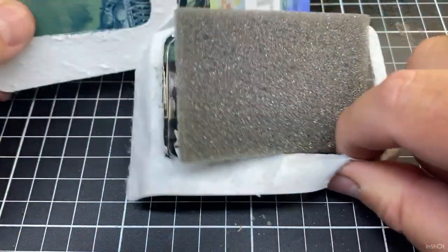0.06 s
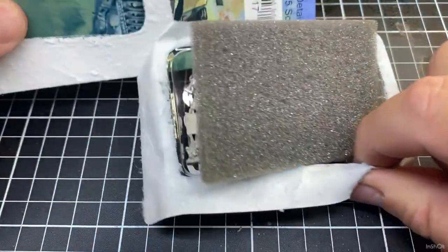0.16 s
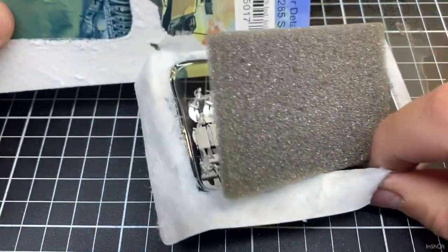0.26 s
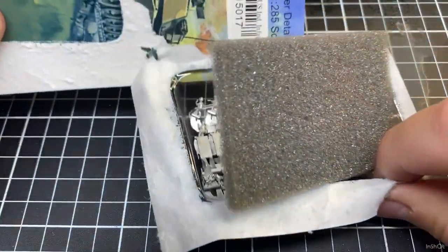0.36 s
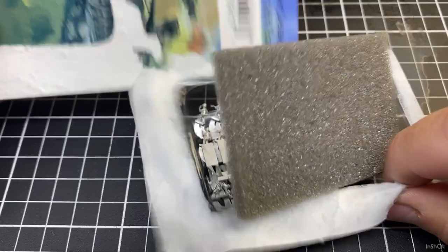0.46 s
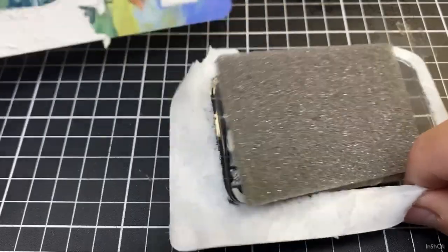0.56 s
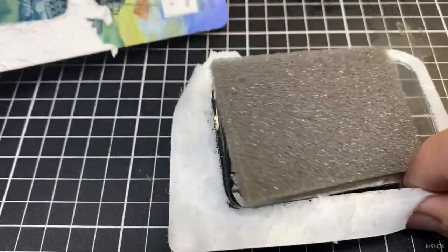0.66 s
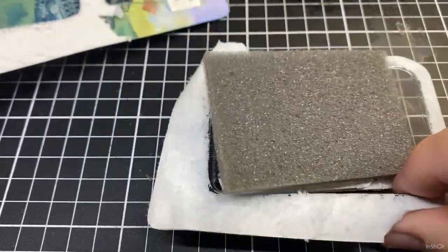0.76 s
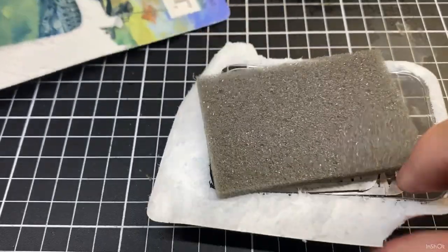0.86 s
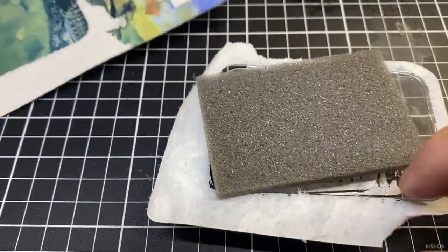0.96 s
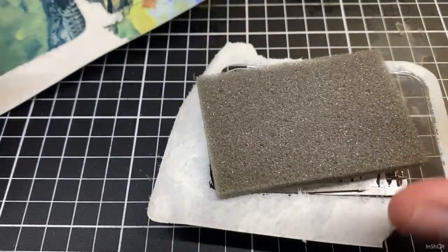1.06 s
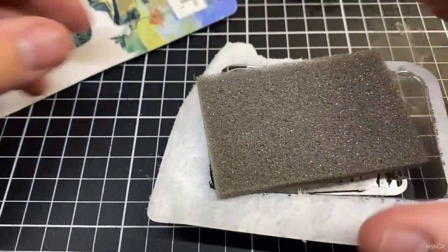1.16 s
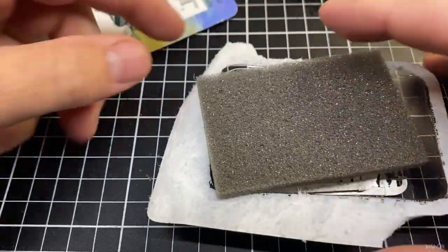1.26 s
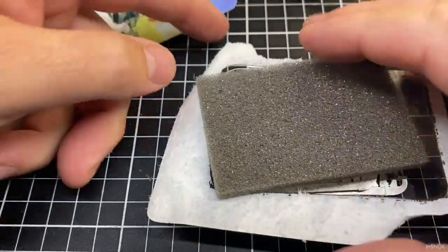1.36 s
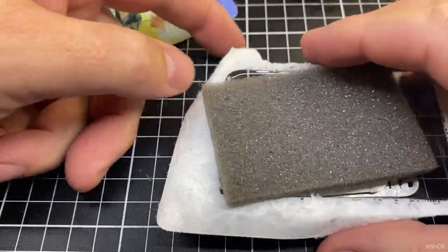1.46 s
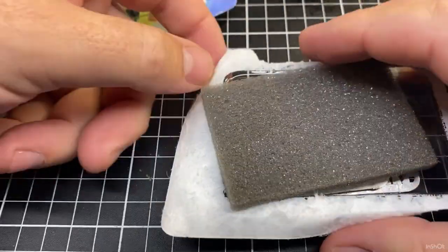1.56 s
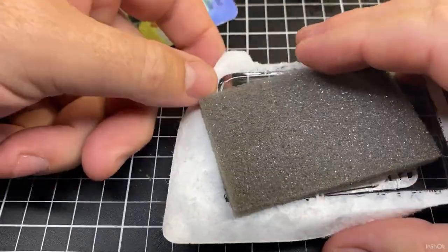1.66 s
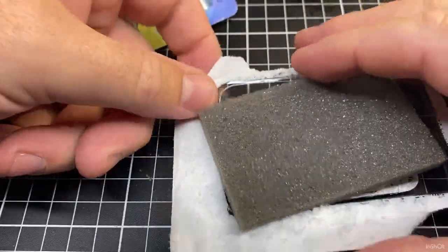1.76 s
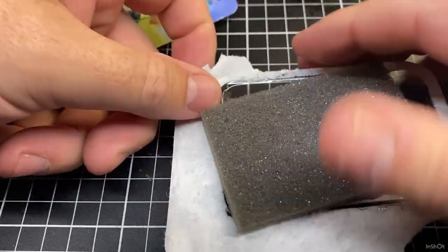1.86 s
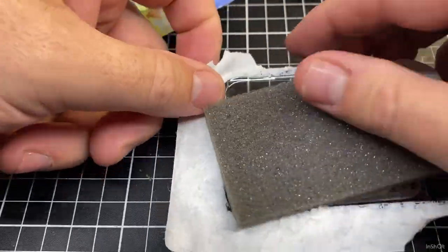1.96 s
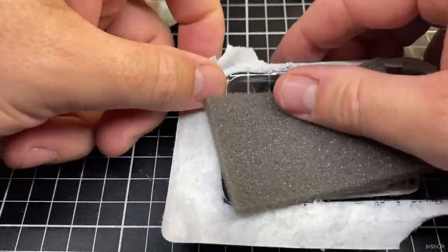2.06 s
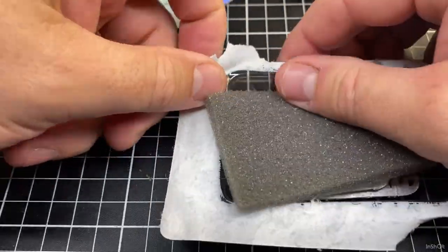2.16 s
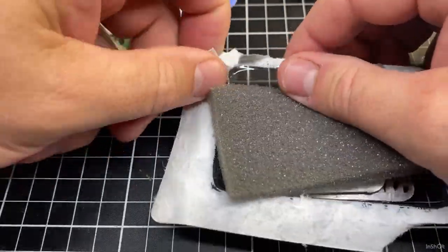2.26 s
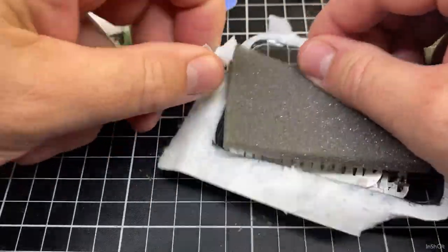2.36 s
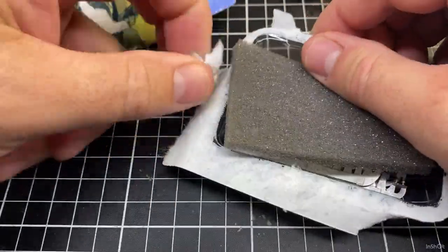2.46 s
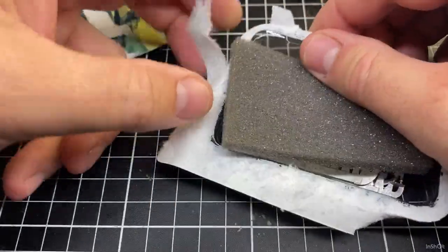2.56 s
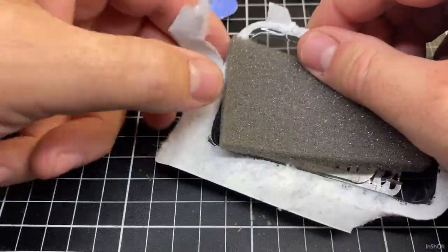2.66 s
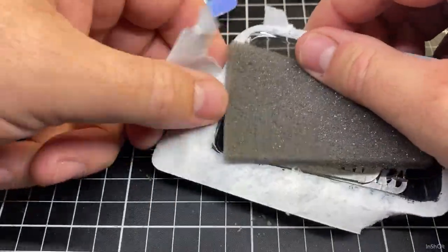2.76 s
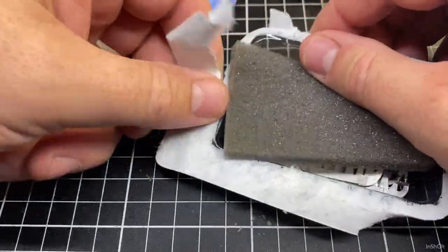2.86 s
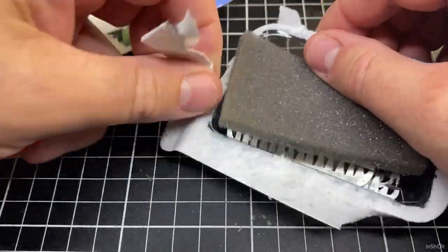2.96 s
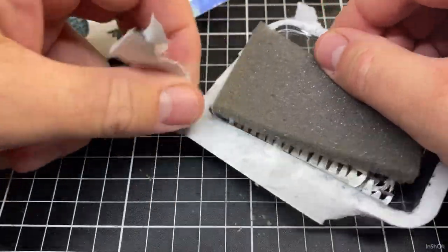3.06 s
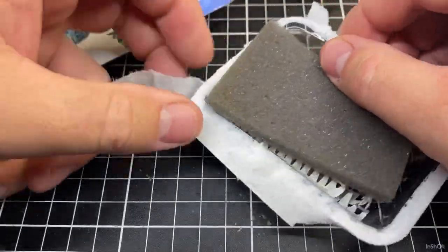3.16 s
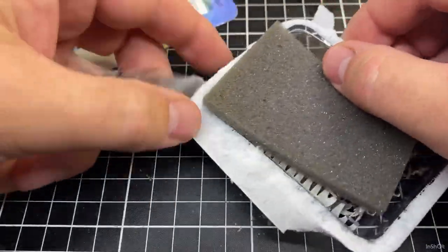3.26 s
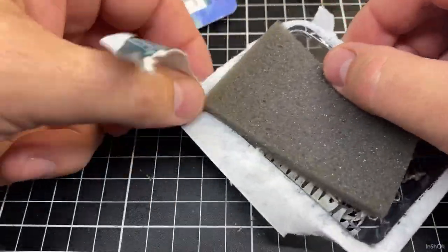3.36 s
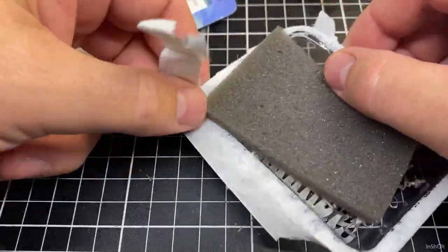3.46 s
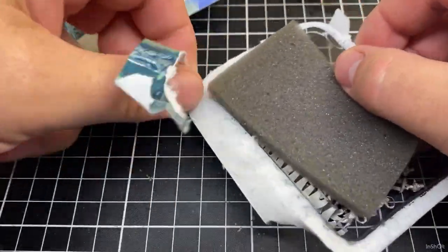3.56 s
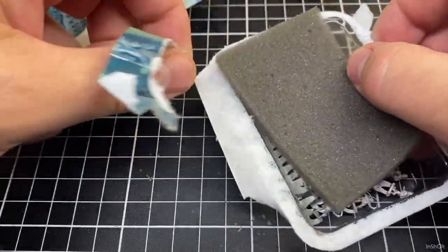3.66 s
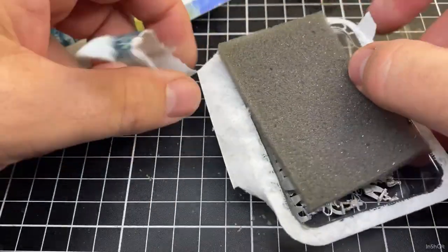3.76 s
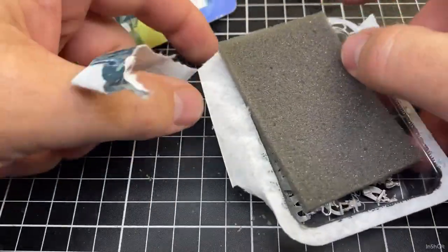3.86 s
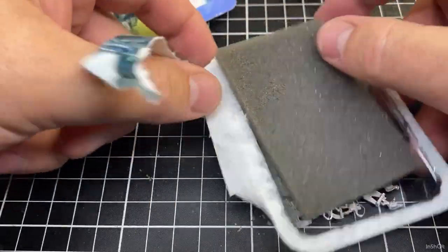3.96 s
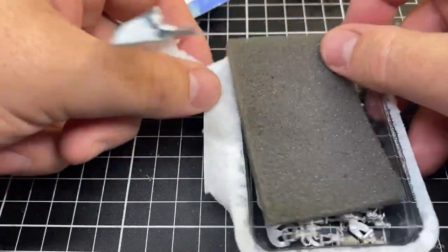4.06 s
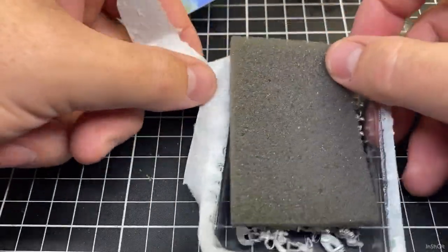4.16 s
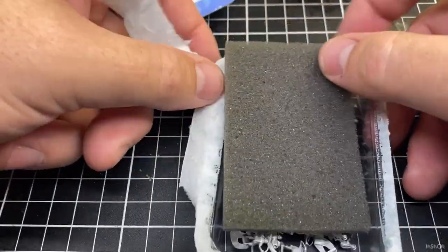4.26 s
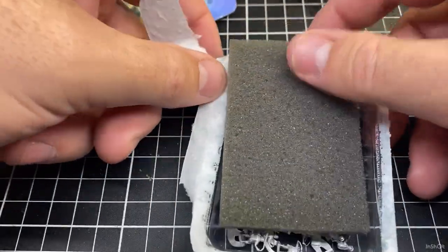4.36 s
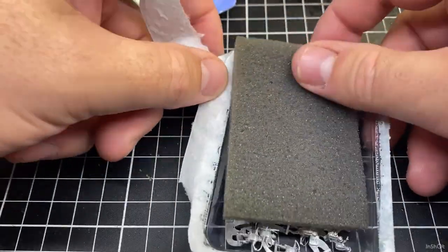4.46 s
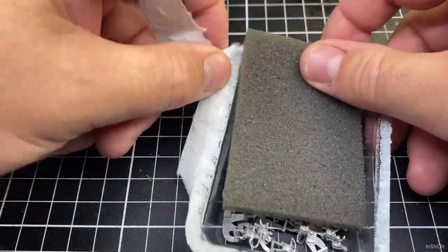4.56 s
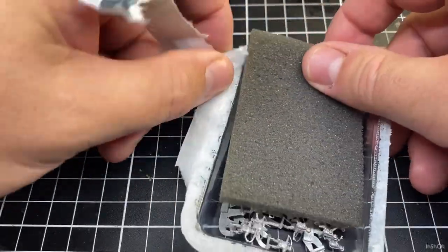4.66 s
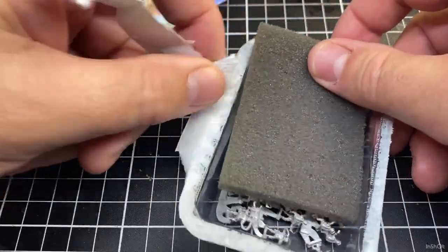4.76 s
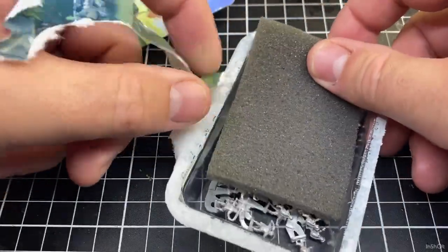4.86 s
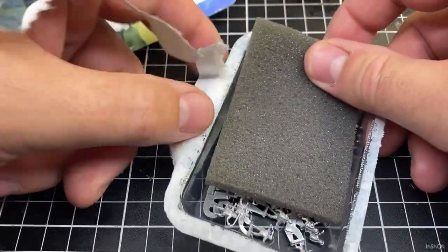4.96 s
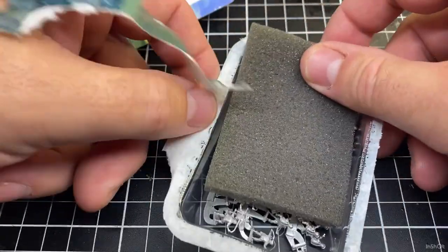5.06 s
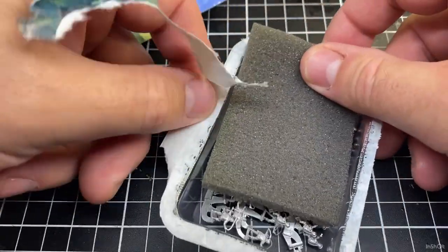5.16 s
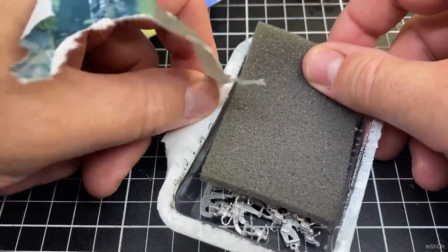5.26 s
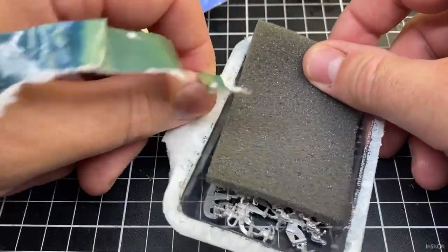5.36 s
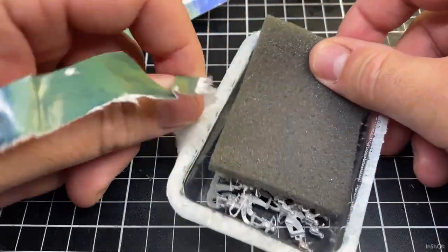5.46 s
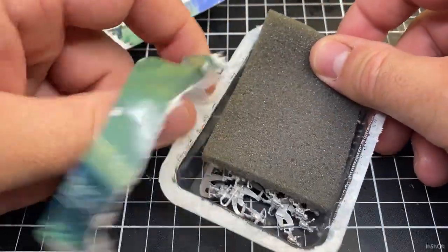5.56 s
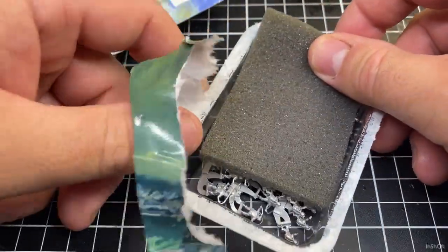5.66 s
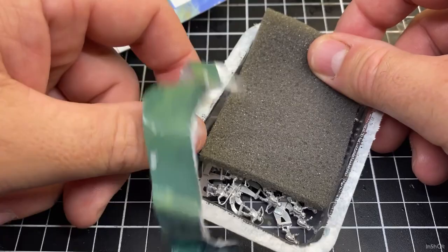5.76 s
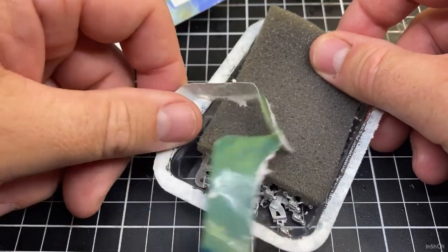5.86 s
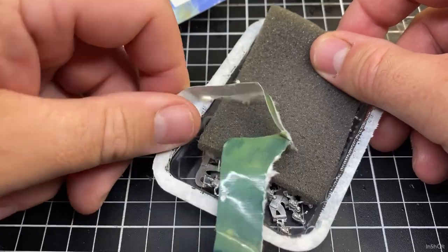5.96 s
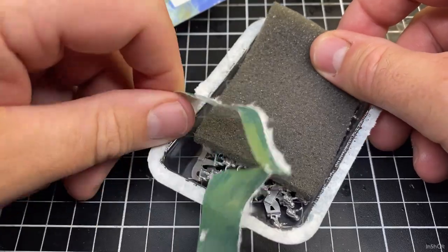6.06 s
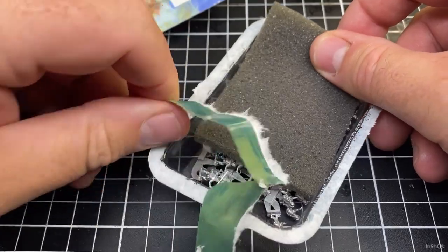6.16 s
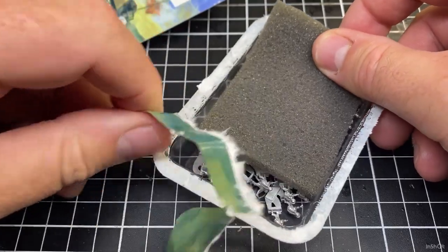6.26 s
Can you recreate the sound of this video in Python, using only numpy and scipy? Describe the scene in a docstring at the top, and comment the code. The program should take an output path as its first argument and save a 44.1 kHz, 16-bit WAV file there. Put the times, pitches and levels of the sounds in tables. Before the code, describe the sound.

Hands peel paper from a thin plastic blister tray. A dense clatter of rips, plastic flexing and table knocks opens, then a quiet lull with small ticks. Crisp fibrous tears and single snaps follow in uneven groups, separated by soft rustling. Close and dry, with a short room tail and barely audible hum beneath.

```python
"""Sharp paper snaps and dense bright crackles, with knocks of hollow plastic, burst out at once and return in spells.
Hands peel the paper backing off a plastic blister tray on a table: noise under crackling envelopes is the fibres,
and the same ruptures shake resonant modes that make the tray flex, pop and ring briefly.
Decaying low cosines bump the table top; a small quiet room answers with a short tail of shaped noise.
Low rumble, wavering hum and a faint tone lie underneath."""
import sys
import numpy as np
from scipy import signal
from scipy.fft import rfft, irfft, next_fast_len
from scipy.io import wavfile
from scipy.ndimage import uniform_filter1d, map_coordinates

SR = 44100
rng = np.random.default_rng(int(sys.argv[2]) if len(sys.argv) > 2 else 0)


def undo_db(level):
    """Turn decibels back into plain size, where 20 dB means ten times bigger."""
    steps = np.asarray(level, float) / 20
    return 10 ** steps


def unload_audio(sound):
    """Save the sound as a 16-bit wav file, at the path given as the first command line argument."""
    columns = np.transpose(np.atleast_2d(sound))
    # keep every value between -1 and 1, then stretch to whole-number steps
    steps = np.round(np.clip(columns, -1, 1) * 32767)
    wavfile.write(sys.argv[1], SR, steps.astype(np.int16))


N = 277830  # samples

# Levels in the tables are relative, ahead of the mix gains.
# Low rumble level over time: t/s, level/dB
RUMBLE = [(0.0, -50), (0.44, -48.5), (1.07, -63), (1.93, -59), (2.26, -56), (2.53, -60), (3.8, -53),
          (4.02, -56.5), (4.4, -59.5), (4.74, -63), (5.07, -70), (5.47, -60), (5.88, -66), (6.3, -63.5)]
# Colour of the rumble: f/Hz, density level/dB
AIR = [(15, -45), (25, -5.5), (53, -5.5), (80, -5), (160, -10), (300, -11.5), (450, -20), (1200, -33),
       (5000, -44), (16000, -49)]
# Mains hum: f/Hz, level/dB
HUM = [(50, -63.5), (100, -65)]
# Faint tone that drops out late on and creeps partly back: t/s, level/dB
DRONE = [(0, -67), (4.5, -71), (4.7, -101), (6.3, -83.5)]
DRONE_HZ = 295.4
# Decay of the room's answer: f/Hz, t60/s
WALLS = [(200, 0.313), (2000, 0.314), (10000, 0.1346)]
# Tray against table: t/s, level/dB, pitch f/Hz, t60/s
BUMPS = [(0.004, -31.5, 72.6, 0.128), (0.078, -22, 219, 0.0274), (0.278, -34.5, 150.5, 0.14),
         (0.369, -15, 81.8, 0.0234), (0.473, -21, 159.4, 0.0886), (.478, -22.5, 85.6, 0.116),
         (0.489, -20.5, 329.7, 0.069), (0.508, -18, 53.8, 0.135), (0.708, -33, 66.6, 0.172),
         (0.822, -37, 55.6, 0.083), (.842, -35, 69, .06), (0.852, -32.5, 290, 0.0634),
         (0.893, -36, 74.8, .08), (0.925, -29, 58.6, 0.071), (0.942, -26, 112.6, 0.038),
         (1.576, -34.5, 281, 0.0246), (2.841, -44.5, 179.2, 0.17), (3.136, -47.5, 77.5, 0.19),
         (3.743, -40, 203.7, 0.089), (4.0, -36, 298.4, 0.052), (4.102, -44, 151, 0.066),
         (4.574, -34.5, 344.2, 0.08), (5.419, -33.5, 250.3, 0.076)]
# Modes of the plastic shell: f/Hz, width/Hz, level/dB
TRAY = [(373, 352, -3.5), (544.4, 239, -2.5), (830.6, 217.3, 1), (1040, 187.4, 0.5), (1454.7, 539, -3),
        (1750, 499.6, -1.5), (2156.4, 559, -2.5), (2681, 625, -2.5), (3229, 603, -0.5), (4000, 1060, -6.5),
        (5486, 950, -8)]
# Colour of the tearing paper: f/Hz, density level/dB
PAPER = [(1200, -24), (3000, -27), (4500, -8), (5900, -5), (6900, -2.5), (7700, -1), (8600, 5.5),
         (9800, -1), (11200, -3.5), (12700, -5), (14500, -4), (16000, -15)]
# Balance of the paper's treble: t/s, top treble up and the rest down level/dB
TAUT = [(0, 0.5), (.5, -1), (1.5, -1.5), (2.2, 2), (2.37, -3), (2.9, 1), (3.55, -0.5), (4.6, 0.5),
        (5.25, 2.5), (5.45, -1), (6.1, 0.5), (6.3, 0.5)]
# Fingers handling the pack between rips: t/s, paper rustle level/dB, tray rustle level/dB
PULL = [(0, -51, -38.5), (0.65, -63, -55.5), (0.9, -62.5, -61.5), (1.2, -105, -89), (1.29, -89.5, -84.5),
        (1.31, -64.5, -71), (1.45, -67, -60), (1.54, -74.5, -66.5), (1.62, -62, -58), (1.95, -66.5, -57.5),
        (2.09, -55.5, -57), (2.53, -63, -58), (3.16, -56.5, -52.5), (3.71, -50.5, -53.5), (3.9, -70.5, -65),
        (4.04, -62, -52.5), (4.4, -63.5, -65.5), (4.82, -53.5, -50.5), (4.885, -60, -49),
        (4.895, -67.5, -63), (4.94, -79, -78.5), (5.0, -68, -66), (5.02, -51, -55), (5.06, -53, -52),
        (5.16, -56, -59), (5.56, -59, -55.5), (5.75, -62, -61.5), (5.93, -69.5, -72), (6.0, -67, -59),
        (6.3, -54.5, -48)]
# Long tears, one curve of effort each: t/s, paper level/dB, tray level/dB
TEARS = [
    [(0, -39, -31.5), (0.035, -43, -52.5), (0.1, -38.5, -39.5), (0.155, -43, -49), (0.175, -36.5, -35),
     (0.22, -41, -36), (0.252, -42.5, -46.5), (0.262, -37, -31), (0.297, -35, -30.5), (0.305, -47, -46.5),
     (0.345, -41.5, -46.5), (0.36, -42.5, -31.5), (0.38, -39, -32), (0.395, -50, -61.5),
     (0.415, -43.5, -40.5), (0.44, -39, -43), (0.45, -52, -56.5)],
    [(0.455, -38.5, -41.5), (0.466, -41.5, -41), (0.47, -24.5, -22), (0.51, -22, -17.5),
     (0.526, -21.5, -25), (0.535, -45, -43), (0.57, -45, -43), (0.63, -61, -47.5)],
    [(2.11, -68, -59), (2.122, -50.5, -62), (2.19, -43.5, -55), (2.2, -33, -30.5), (2.228, -37, -38),
     (2.25, -44.5, -46), (2.262, -31, -39), (2.28, -41, -44.5)],
    [(2.285, -34, -47.5), (2.303, -33.5, -31.5), (2.315, -23.5, -27.5), (2.338, -24, -31),
     (2.355, -22, -35), (2.389, -26, -39), (2.409, -30.5, -42.5), (2.419, -56.5, -63.5), (2.44, -57.5, -64)],
    [(2.77, -52.5, -47), (2.81, -38.5, -44), (2.845, -41, -45), (2.88, -47, -40.5), (2.9, -58.5, -45),
     (2.94, -40, -48.5), (2.985, -33.5, -32), (3.038, -37.5, -38.5), (3.048, -54, -49.5), (3.1, -45, -48)],
    [(3.43, -45.5, -65), (3.462, -47, -70), (3.48, -42, -38), (3.5, -41.5, -41.5), (3.532, -33.5, -33),
     (3.56, -41.5, -37), (3.585, -46, -45.5), (3.62, -37, -38), (3.674, -44, -46), (3.7, -70, -61.5)],
    [(4.66, -54, -70.5), (4.68, -45, -48), (4.704, -37, -37), (4.76, -33.5, -34), (4.782, -42, -37),
     (4.8, -68.5, -69.5)],
    [(5.165, -54, -62.5), (5.175, -44.5, -66), (5.21, -42, -51.5), (5.24, -42, -55), (5.28, -41, -52),
     (5.36, -37, -44.5), (5.385, -31.5, -39.5), (5.42, -32, -37.5), (5.435, -28.5, -29.5),
     (5.468, -29.5, -30.5), (5.485, -43.5, -36.5), (5.51, -57, -55)],
    [(5.97, -62, -67), (6.0, -42.5, -49), (6.065, -40, -43), (6.09, -57.5, -77), (6.105, -48, -63),
     (6.15, -36.5, -44.5), (6.17, -41.5, -57.5), (6.19, -34.5, -37), (6.268, -46, -51), (6.276, -32.5, -32),
     (6.3, -36.5, -38)],
]
# Where each long tear shakes the tray most: f/Hz
TEAR_GRIP = [2000, 2110, 2680, 1750, 2910, 4000, 2230, 2920, 3200]
# How narrowly each long tear picks its modes: fall/dB per octave
TEAR_FOCUS = [0.96, 3.6, 4.2, 8.2, 3.2, 4, 4.24, 3.4, 2.78]
# Short rips: start t/s, length/s, paper level/dB, tray level/dB, most shaken f/Hz
RIPS = [(0.776, 0.074, -63, -52.5, 1620), (0.705, 0.029, -53, -55, 2000), (0.859, 0.018, -49, -43, 2400),
        (0.888, 0.014, -57, -40, 1560), (1.301, 0.0886, -106, -58.5, 1790),
        (1.392, 0.042, -61.5, -60.5, 850), (1.564, 0.053, -55, -44, 814), (1.674, 0.045, -55.5, -81, 2000),
        (1.73, 0.044, -45.5, -44.5, 1540), (1.779, 0.067, -54, -52, 2320),
        (2.473, 0.02666, -45.5, -49.5, 2120), (2.613, 0.02277, -44, -41, 1760),
        (2.636, 0.04, -52, -51.5, 2460), (2.849, 0.0096, -23, -39.5, 2490),
        (3.267, 0.027, -40.5, -43.5, 1930), (3.372, 0.052, -50, -46, 2540),
        (3.479, 0.0048, -34.5, -52.5, 3200), (3.538, 0.014, -28.5, -28.5, 2600),
        (3.75, .02, -43, -43, 1970), (3.768, 0.046, -59.5, -52, 1500), (3.968, .018, -51.5, -54.5, 2070),
        (3.989, 0.024, -41, -37.5, 2500), (4.049, 0.096, -48, -46.5, 970),
        (4.206, 0.034, -44.5, -45.5, 2530), (4.246, 0.075, -51, -53, 2000),
        (4.547, 0.023, -49, -56.5, 2530), (4.564, 0.0046, -37, -39, 2670), (4.568, 0.022, -27.5, -27, 1990),
        (4.595, .04, -44, -68, 1900), (5.093, 0.039, -48, -50.5, 1990), (5.587, 0.042, -49.5, -43.5, 1500),
        (5.627, .02, -50.5, -47.5, 3000), (5.628, 0.021, -41, -39, 2480), (5.669, 0.0062, -57.5, -59, 2800),
        (5.8, 0.0502, -46, -48, 2520)]
# Single ruptures of the paper: t/s, paper level/dB, tray level/dB, tail t60/s, most shaken f/Hz
SNAPS = [(0.006, -24, -22.5, 0.0153, 2130), (0.052, -25.5, -37, .015, 2500), (0.068, -31, -33, 0.024, 2000),
         (0.075, -22.5, -26.5, 0.019, 2280), (.088, -29.5, -37.5, .015, 2500),
         (0.1718, -36, -30, 0.013, 2500), (0.182, -35.5, -32.5, 0.018, 2000),
         (.268, -29.5, -44, 0.017, 2500), (0.289, -34, -39, .025, 3020), (0.036, -37, -39.5, 0.013, 2490),
         (0.046, -30.5, -44.5, 0.017, 2490), (0.2562, -32.5, -36.5, 0.012, 3000),
         (0.358, -36, -40.5, .02, 2000), (0.363, -28, -26.5, 0.042, 1330),
         (0.411, -26.5, -35, 0.0099, 1637), (0.427, -31.5, -31.5, 0.026, 2000),
         (0.466, -23.5, -16, 0.035, 1420), (0.4747, -16, -24, 0.024, 1860), (.489, -29.5, -19, .015, 2590),
         (0.495, -25, -19, 0.023, 2446), (0.549, -38, -22.5, 0.013, 3027),
         (0.838, -41, -42.5, 0.0294, 2000), (0.8421, -35, -31.5, 0.044, 2780),
         (1.817, -27, -22.5, 0.01767, 2130), (2.204, -29, -20, 0.02, 3200),
         (2.209, -21, -21.5, 0.016, 2620), (2.219, -30.5, -25, 0.017, 2770),
         (2.244, -24.5, -28, 0.011, 2610), (2.279, -29, -35.5, .008, 3000),
         (2.292, -24, -27.5, 0.009, 1720), (2.809, -26.5, -30.5, 0.012, 2800),
         (2.818, -28, -39, 0.011, 2870), (2.853, -25, -26, 0.013, 2500), (2.8939, -37, -34.5, 0.013, 3000),
         (2.918, -22, -19.5, 0.0168, 1790), (2.941, -34, -46.5, .015, 3000),
         (2.976, -30, -34.5, 0.022, 2500), (3.008, -41.5, -37.5, .02, 2500),
         (3.426, -28, -52, 0.0091, 3530), (3.484, -21.5, -33, 0.02, 3100), (3.54, -23.5, -34, 0.012, 4000),
         (3.548, -27.5, -30.5, 0.02, 3800), (3.56, -26.5, -36.5, .015, 3200),
         (3.593, -25, -32.5, 0.021, 3200), (3.611, -27.5, -27, 0.017, 2110),
         (3.637, -29, -39.5, 0.011, 1780), (3.655, -29, -42, 0.023, 2740), (3.677, -25, -33.5, 0.01, 2310),
         (3.74, -31, -30, 0.0443, 2000), (3.986, -31, -32, 0.01, 2500), (4.003, -41.5, -28.5, 0.0062, 3060),
         (4.005, -43.5, -44, 0.013, 3000), (4.489, -50, -48, 0.024, 3020),
         (4.569, -32.5, -28, 0.0136, 2380), (4.571, -20.5, -32, 0.027, 1910),
         (4.615, -33.5, -42.5, 0.027, 1520), (4.668, -33.5, -39.5, 0.011, 1610),
         (5.171, -38.5, -45.5, 0.012, 2540), (5.119, -41, -45, 0.012, 3000),
         (5.193, -23.5, -31.5, 0.013, 3000), (5.247, -21, -34.5, 0.0107, 3000),
         (5.2222, -35, -44.5, .012, 3000), (5.301, -31.5, -37, 0.028, 3220),
         (5.338, -34.5, -46, 0.018, 3000), (5.3728, -30.5, -36.5, 0.0091, 3000),
         (5.41, -24, -33.5, 0.013, 3200), (5.395, -30, -50.5, 0.014, 1450),
         (5.423, -25.5, -22.5, 0.047, 1740), (5.472, -20.5, -24, 0.01, 1360),
         (5.647, -24.5, -26, 0.019, 5400), (5.957, -23, -23.5, 0.0065, 1750),
         (5.976, -32.5, -30.5, 0.027, 2080), (5.989, -28, -31, .035, 1770), (6.102, -38.5, -49, .02, 3200),
         (6.176, -25.5, -28.5, 0.014, 1330)]
# Dull knocks and pops of the tray: t/s, level/dB, tail t60/s, most shaken f/Hz, fall/dB per octave
KNOCKS = [(0.71, -34, 0.032, 1223, 10.5), (.795, -45.5, 0.058, 1600, 14.5),
          (0.805, -36.5, 0.025, 1690, 13.5), (0.881, -35, 0.031, 1630, 18),
          (0.921, -33.5, 0.053, 1140, 10.5), (0.934, -26.5, 0.028, 1878, 24),
          (0.943, -27.5, 0.022, 1645, 11.5), (1.407, -59, 0.031, 796, 15.5),
          (1.575, -39.5, 0.0128, 812, 21.5), (1.586, -36.5, 0.0128, 820, 37),
          (1.594, -38, 0.0216, 800, 9.5), (1.607, -37.5, 0.017, 837, 34.5), (1.628, -42, 0.013, 880, 12),
          (1.754, -52, .02, 850, 13.5), (1.765, -39, 0.0216, 970, 9.5), (2.31, -37, .08, 1790, 24.5),
          (2.329, -25.5, .06, 1310, 11.5), (2.405, -35.5, .02, 950, 12), (2.856, -34.5, 0.059, 880, 21.5),
          (2.947, -39, .02, 950, 16.5), (3.269, -41.5, 0.066, 1060, 33.5), (3.543, -27.5, 0.032, 949, 35),
          (3.561, -33.5, 0.0195, 850, 21), (3.576, -40, .02, 903, 17), (3.593, -30.5, 0.028, 910, -2.5),
          (3.63, -42, 0.032, 1014, 21.5), (3.662, -40, 0.027, 1090, 22.5), (3.744, -31, 0.032, 1017, 29.5),
          (4.13, -38.5, 0.0166, 927, 27.5), (4.385, -51, 0.023, 885, 16), (5.252, -39.5, 0.083, 1047, 24),
          (5.39, -36.5, 0.088, 880, 18.5), (5.441, -35.5, 0.058, 924, 11.5),
          (5.425, -36, 0.055, 3200, 19.5), (5.445, -33.5, .05, 3200, 22), (5.453, -39, 0.037, 3200, 9),
          (5.645, -23.5, 0.034, 1310, 10), (5.792, -48, 0.025, 950, 5), (5.959, -32.5, 0.031, 1075, 28),
          (6.178, -30.5, 0.015, 1013, 24)]
# Likeness of the two sides: f/Hz, likeness (0 to 1)
ALIKE = [(60, 1), (200, 0.847), (700, 0.446), (1300, 0.283), (4400, 0.47), (5600, 0.41)]
# Tilt between the sides, positive to the left, shared out in record(): f/Hz, level/dB
LEFT = [(61, -1.6), (201, -5.2), (701, -6.3), (1301, -2.6), (2401, -6), (5501, -6), (6901, 0), (16001, 0)]
# Phase by which left leads right: f/Hz, lead/half turns
LEAD = [(5000, -.13), (5900, -.13), (6550, .04), (7600, .57), (8300, .87), (8650, 1), (9500, 1),
        (10000, 1.27), (11900, 2), (12500, 2), (13800, 2.48), (14900, 3), (16000, 3)]

SNAP_HOLD, KNOCK_S, RIP_TAIL_S = 0.144, 0.002, 0.014  # snap hold as a share of its tail, knock hold, t60 after a rip
SNAP_FOCUS_DB = 4  # how narrowly a snap picks its modes, per octave
DULL_FOCUS = 0.347  # extra focus of a rip with little paper: dB per octave for each dB of tray over paper
SNAP_BLOW_DB, KNOCK_BLOW_DB = 10.5, 20.5  # sharp first blow: over a snap's rubbing, over a knock's level
KNOCK_RUB_DB, KNOCK_PAPER_DB = -3.5, -31  # tray rubbing and stirred paper, against a knock's level
FLEX_DB, FLEX_PER_S = 1.8, 30  # depth and knots a second of the tray's bending in a long tear
TOP_HZ = 15900  # the treble ends here
MONO_HZ = 6300  # above this both sides carry nearly one signal


def unit(x):
    """Scales to rms 1."""
    return x / np.sqrt(np.mean(x ** 2) + 1e-20)


def along(points, hz):
    """Reads (Hz, value) points on a log frequency axis."""
    f, v = np.transpose(points)
    return np.interp(np.log(hz + 1), np.log(f + 1), v)


def curves(rows):
    """Draws one value per sample for each column after the time."""
    s, *columns = np.transpose(rows)
    return [np.interp(np.arange(N) / SR, s, column) for column in columns]


def wobble(rate):
    """A smooth random curve, rate knots a second."""
    knots = rng.standard_normal(int(N * rate / SR) + 4)
    return map_coordinates(knots, [np.arange(N) * rate / SR])


def filtered(x, response):
    """Applies a complex response of frequency."""
    length = x.shape[-1]
    m = next_fast_len(length + 8192)
    return irfft(rfft(x, m) * response(np.fft.rfftfreq(m, 1 / SR)), m)[..., :length]


def coloured(spectrum):
    """Two unrelated noises of one colour, rms 1."""
    return unit(filtered(rng.standard_normal((2, N)), lambda hz: undo_db(along(spectrum, hz))))


def rumble_and_hum():
    """Low rumble as coloured noise, with hum and a faint tone wavering in level and phase."""
    t = np.arange(N) / SR

    def tone(hz, db):
        level = np.sqrt(2) * undo_db(db + 2.0 * wobble(8))
        return level * np.sin(2 * np.pi * hz * t + 0.66 * wobble(17.0))

    hum = sum(tone(hz, db) for hz, db in HUM) + tone(DRONE_HZ, curves(DRONE)[0])
    rumble = undo_db(curves(RUMBLE)[0] + 3.1 * wobble(12.0)) * coloured(AIR)
    return rumble + hum * [[1], [.3]]


def walls(x):
    """The room answers with a noise tail in which each frequency dies at its own speed."""
    hz, t, z = signal.stft(rng.standard_normal((2, SR // 2)), SR, nperseg=256)
    decay = undo_db(-60 * t / along(WALLS, hz)[:, None])
    tail = signal.istft(z * decay, SR, nperseg=256)[1]
    late = np.pad(x, ((0, 0), (200, 0)))  # pre-delay in samples
    return signal.fftconvolve(late, tail / np.linalg.norm(tail[0]), axes=1)[:, :N]


def bumps():
    """The tray knocks the table top: a soft low thud, its overtone on a decay of its own."""
    out, t = np.zeros(N + SR), np.arange(SR // 3) / SR
    for s, db, hz, t60 in BUMPS:
        overtone = 1.4 * undo_db(-60 * t / 0.037) * np.cos(2 * np.pi * 2.319 * hz * t)
        thud = np.cos(2 * np.pi * hz * t) + overtone
        soft_onset = 1 - np.exp(-t / 0.00454)
        out[round(s * SR):][:len(t)] += undo_db(db - 60 * t / t60) * soft_onset * thud
    return out[:N] * [[1], [.4]]


def mottled(x, depth_db, size, order=128, count=4):
    """Random gain patches, size frames by count bins: the sheet changes shape as it is pulled."""
    z = signal.stft(x, nperseg=order)[2]
    field = uniform_filter1d(rng.standard_normal(z.shape[1:]), count, 0)
    field = uniform_filter1d(field, size, 1)
    return unit(signal.istft(z * undo_db(depth_db * unit(field)), nperseg=order)[1][:, :N])


def crackle(per_s, spread_db, t60, bed, clump_db):
    """Envelope of tiny random ruptures, a few somewhat stronger, over a smooth rub."""
    chance, size = rng.random((2, N))
    ruptures = (chance < per_s / SR) * undo_db(-spread_db * np.log(size + .02))
    decay = undo_db(-60 * np.arange(SR // 20) / SR / t60)
    bursts = signal.fftconvolve(ruptures, decay)[:N]
    return unit((unit(bursts) + bed) * undo_db(clump_db * wobble(45)))


def rupture_list(focus_db):
    """Rips, snaps and knocks as start, hold, paper dB, tray dB, t60, grip Hz, focus dB per octave, blow dB."""
    events = []
    for s, length, paper_db, tray_db, hz in RIPS:
        fall_db = focus_db + DULL_FOCUS * max(tray_db - paper_db, 0)
        events.append((s, length, paper_db, tray_db, RIP_TAIL_S, hz, fall_db, -np.inf))  # no first blow
    for s, paper_db, tray_db, t60, hz in SNAPS:
        events.append((s, SNAP_HOLD * t60, paper_db, tray_db, t60, hz, SNAP_FOCUS_DB, SNAP_BLOW_DB))
    for s, db, t60, hz, fall_db in KNOCKS:
        events.append((s, KNOCK_S, db + KNOCK_PAPER_DB, db + KNOCK_RUB_DB, t60, hz, fall_db,
                       KNOCK_BLOW_DB - KNOCK_RUB_DB))
    return events


def force(fibres, creases, focus_db):
    """Drives paper (row 0) and each tray mode: slow rustle, long tears, and ruptures that are held and die away."""
    def octaves(hz):
        return np.abs(np.log2(np.transpose(TRAY)[0] / hz))

    grain = np.vstack([fibres] + [creases] * len(TRAY))
    paper, tray = undo_db(curves(PULL))
    power = (grain * ([paper] + [tray] * len(TRAY))) ** 2

    # the tray bends during a tear, so each mode swells and fades on its own
    bending = unit(undo_db(FLEX_DB * np.array([wobble(FLEX_PER_S) for mode in TRAY])))
    for tear, hz, fall_db in zip(TEARS, TEAR_GRIP, TEAR_FOCUS):
        s, *effort_db = np.transpose(tear)
        paper, tray = (undo_db(np.interp(np.arange(N) / SR, s, db, left=-120, right=-120)) for db in effort_db)
        modes = unit(undo_db(-fall_db * octaves(hz)))[:, None]
        power += (grain * np.vstack([paper, modes * bending * tray])) ** 2

    blows = np.zeros((len(TRAY), N))
    for start, hold, paper_db, tray_db, t60, hz, fall_db, blow_db in rupture_list(focus_db):
        i = max(round(start * SR), 0)
        t = np.arange(min(SR // 6, N - i)) / SR
        decay = undo_db(-60 * np.clip(t - hold, 0, None) / np.clip(t60, .002, .1))
        shape = (1 - np.exp(-t / 0.000609)) * decay
        # modes near the grip tend to ring loudest
        modes = unit(undo_db(-fall_db * octaves(hz) + 2.12 * rng.standard_normal(len(TRAY))))
        blows[:, i + 20] += undo_db(tray_db + blow_db) * modes * rng.choice([-1, 1])
        # a short snap is one rupture, a long rip is many
        many = 1 - np.exp(-hold / 0.0052)
        # a single rupture is stressed at its first instant
        shape = shape * (1 + 1.2 * (1 - many) ** 2 * np.exp(-t / 0.00064))
        levels = np.append(undo_db(paper_db), undo_db(tray_db) * modes)[:, None]
        power[:, i:i + len(t)] += (levels * shape * grain[:, i:i + len(t)] ** many) ** 2
    return np.sqrt(power), blows


def ringing_tray(drives, blows):
    """Rubbing noise and sharp blows excite the resonant modes of the soft plastic shell."""
    shaking = mottled(rng.standard_normal((2, N)), 2.1, size=10)
    shaking = mottled(shaking, 1.8, size=14, order=512, count=3)
    tray = np.zeros((2, N))
    for k, (drive, blow, (centre, width, db)) in enumerate(zip(drives, blows, TRAY)):
        def mode(f):
            resonance = 1j * f * width / (centre ** 2 - f * f + 1j * f * width)
            return resonance / (1 + 1j * f / (1.331 * centre))  # soft plastic: the upper skirt falls faster

        rubbed = filtered(drive * shaking, mode)
        # a blow reaches the second port a quarter cycle apart
        struck = filtered(blow, lambda f: mode(f) * [[1], [1j]])
        tray += (-1) ** k * undo_db(db) * (rubbed + struck)
    return tray


def torn_sheet(paper):
    """Paper noise follows the tearing force, its treble balance shifting over time."""
    # coarse patches flicker fast; narrow ones linger
    sheet = mottled(coloured(PAPER), 2.485, size=8)
    sheet = mottled(sheet, 3.24, size=18, order=512, count=4)
    taut = undo_db(curves(TAUT)[0])
    top = filtered(sheet, lambda hz: hz > 9200)
    return paper * (top * taut + (sheet - top) / taut)


def tearing():
    """Fibres part one after another in bright crackles; creases and fibres together shake the tray."""
    fibres = crackle(700, spread_db=1.0, t60=0.001605, bed=1.0, clump_db=1.54)
    creases = crackle(500, spread_db=1.5, t60=0.0027, bed=0.65, clump_db=2.0)
    creases = unit(creases + 1.22 * fibres)
    (paper, *drives), blows = force(fibres, creases, focus_db=2.5)
    return undo_db(1.5) * torn_sheet(paper) + undo_db(11) * ringing_tray(drives, blows)


def scene():
    """Two views of the same events, as two microphone ports would catch them."""
    pack = tearing() + bumps()
    return pack + undo_db(-16.0) * walls(pack) + rumble_and_hum()


def top_cut(x):
    """Nothing passes above the cut-off."""
    return signal.sosfilt(signal.butter(12, 16650, fs=SR, output="sos"), x)


def record(dry):
    """The ports differ most in the middle range; the treble is nearly one signal, spread by a phase lead."""
    def alike(hz):
        return np.clip(along(ALIKE + [(MONO_HZ, .992)], hz), 0, 1)

    def side(hz, sign):
        level = undo_db(sign * along(LEFT, hz) / 2)
        return level * np.exp(.5j * np.pi * np.sign(sign) * along(LEAD, hz))

    # low cut at 36 Hz, steep top edge
    dry = filtered(dry, lambda hz: (hz < TOP_HZ) * hz ** 4 / (hz ** 4 + 36 ** 4))
    left = filtered(dry[0], lambda hz: side(hz, 1.0))
    # the right blends the left's view with its own, as far as the two are alike
    blend = lambda hz: side(hz, -0.843) * [alike(hz), np.sqrt(1 - alike(hz) ** 2)]
    right = filtered(dry, blend).sum(axis=0)
    return top_cut(np.array([left, right]))


dry = scene()
out = record(dry)
unload_audio(out)
```